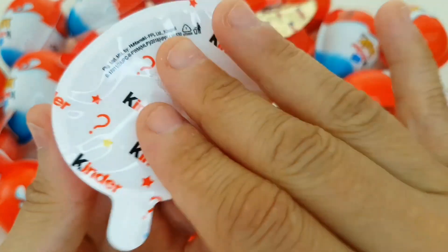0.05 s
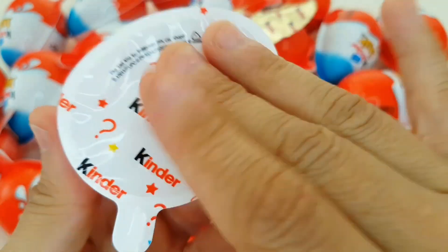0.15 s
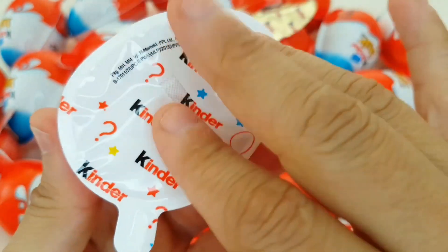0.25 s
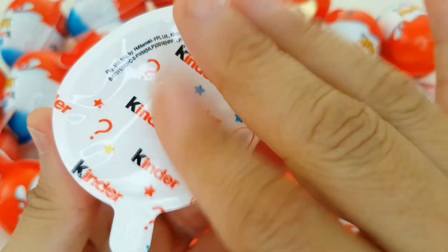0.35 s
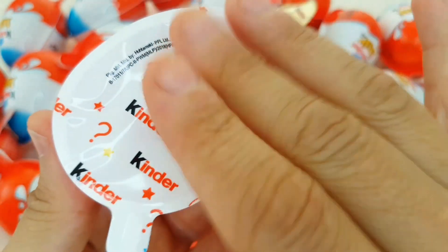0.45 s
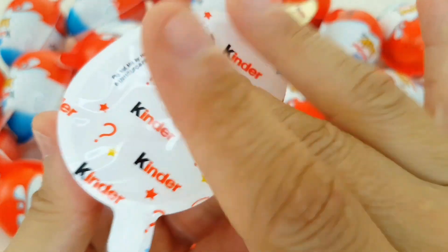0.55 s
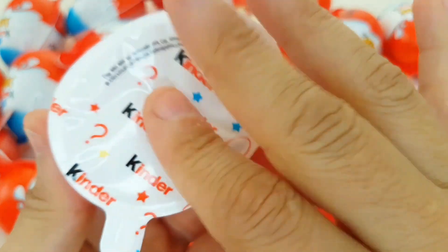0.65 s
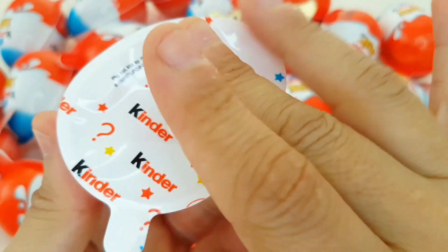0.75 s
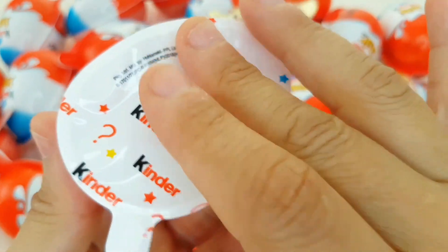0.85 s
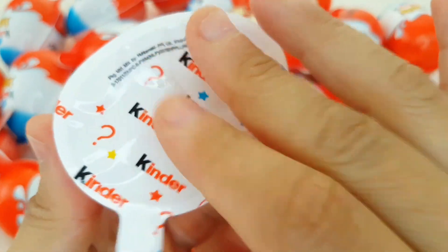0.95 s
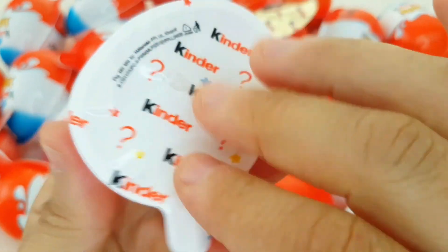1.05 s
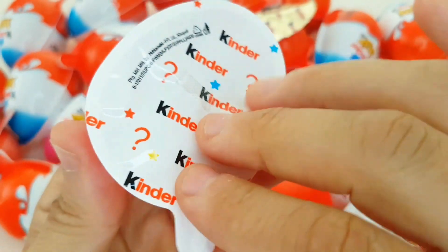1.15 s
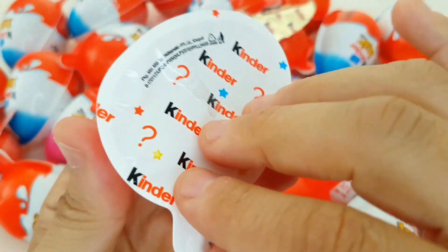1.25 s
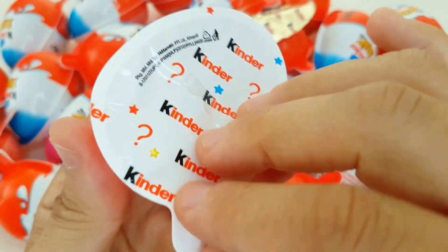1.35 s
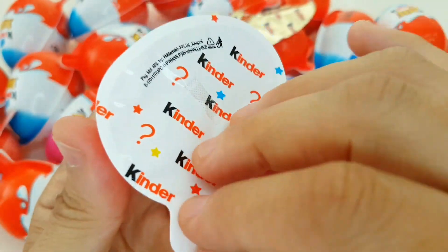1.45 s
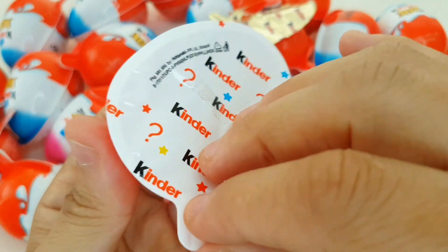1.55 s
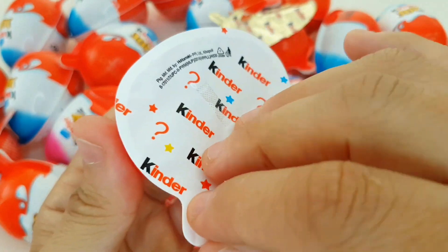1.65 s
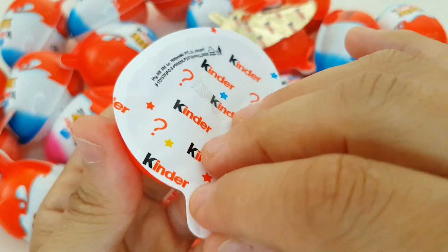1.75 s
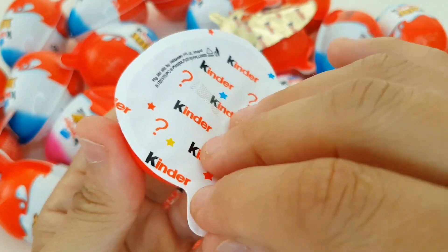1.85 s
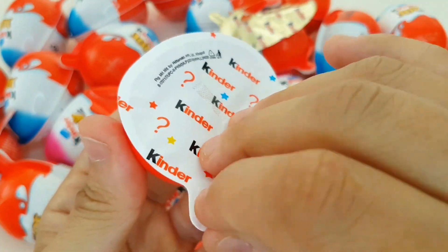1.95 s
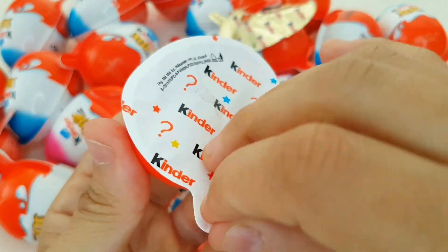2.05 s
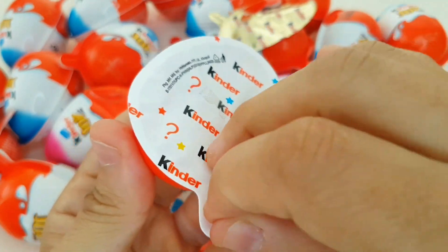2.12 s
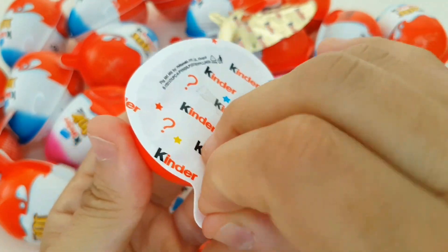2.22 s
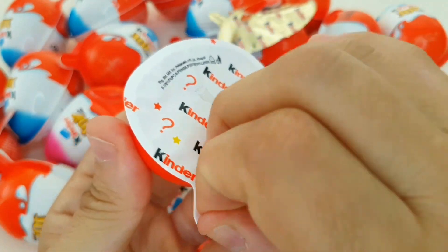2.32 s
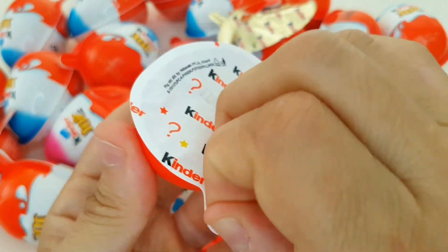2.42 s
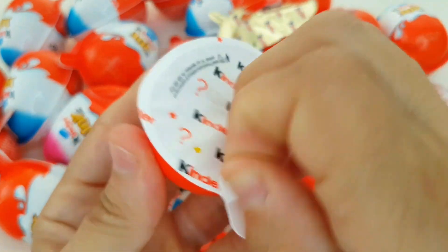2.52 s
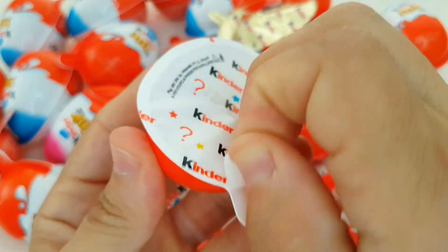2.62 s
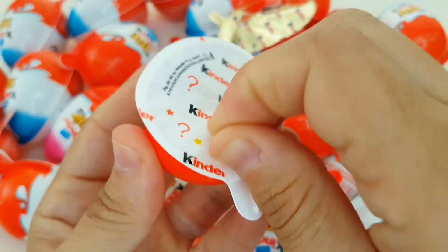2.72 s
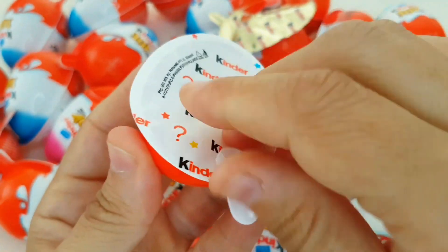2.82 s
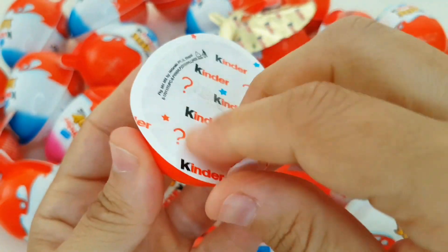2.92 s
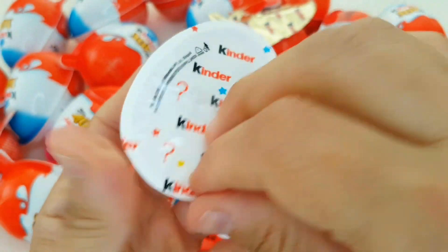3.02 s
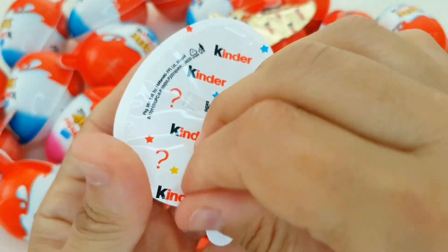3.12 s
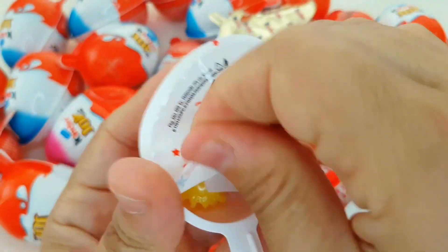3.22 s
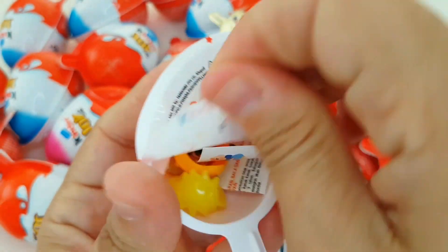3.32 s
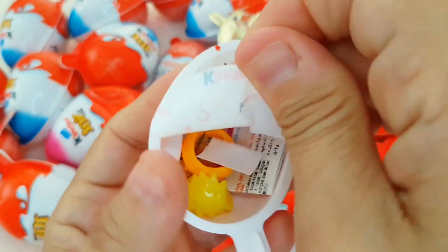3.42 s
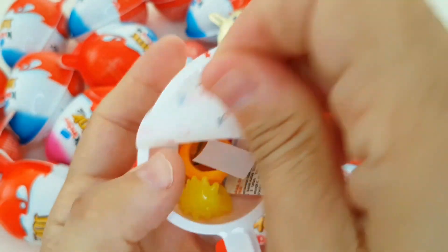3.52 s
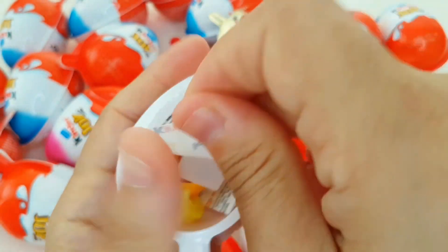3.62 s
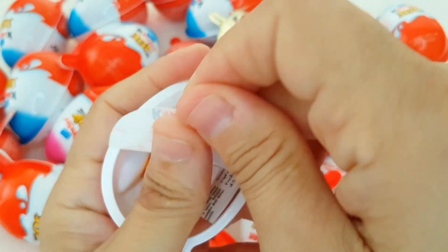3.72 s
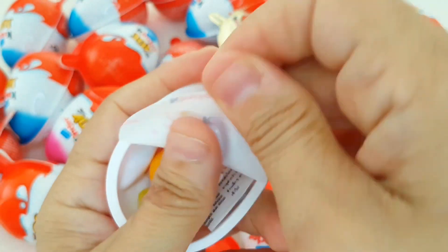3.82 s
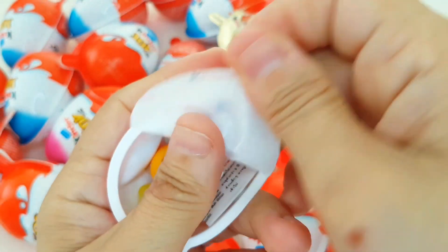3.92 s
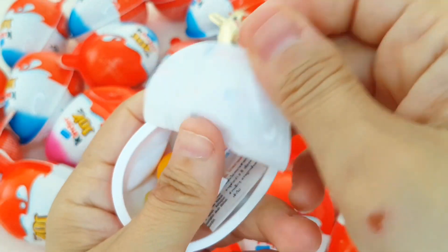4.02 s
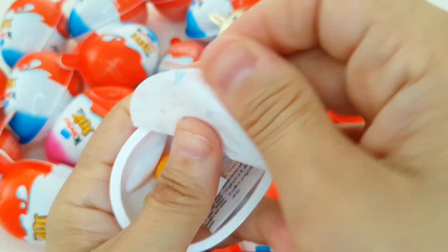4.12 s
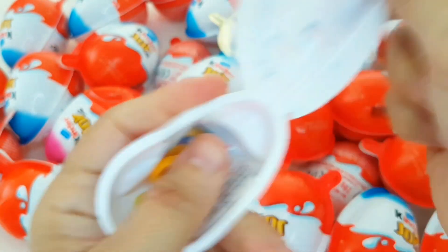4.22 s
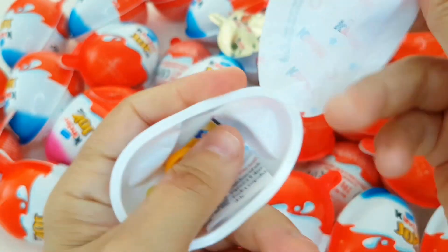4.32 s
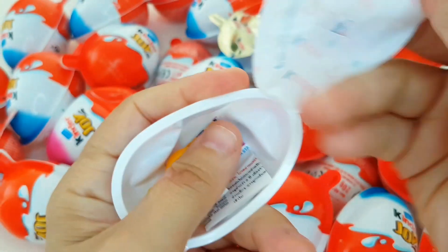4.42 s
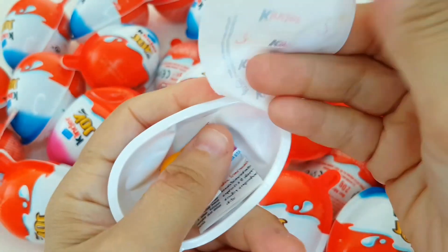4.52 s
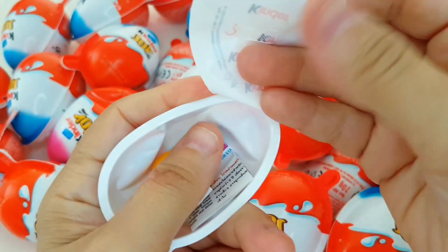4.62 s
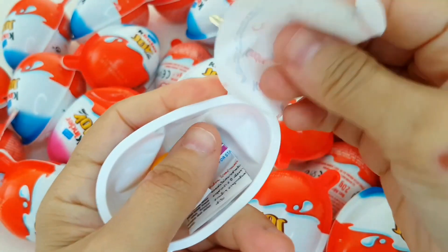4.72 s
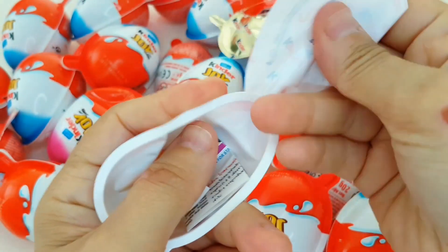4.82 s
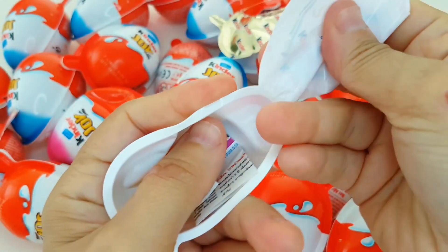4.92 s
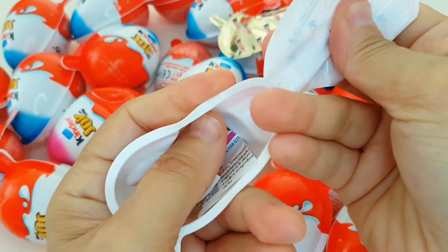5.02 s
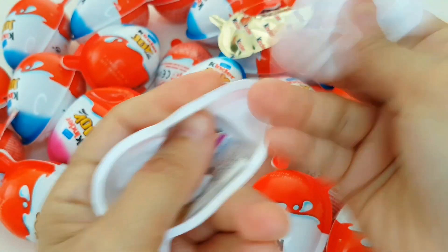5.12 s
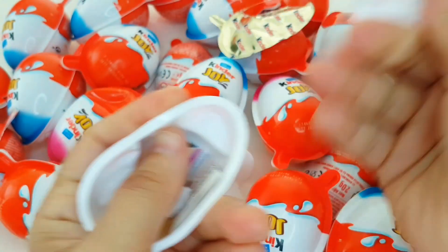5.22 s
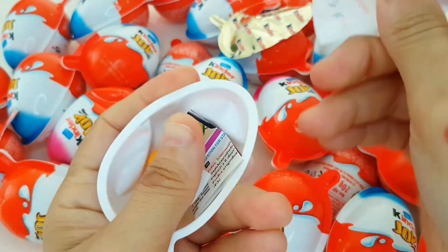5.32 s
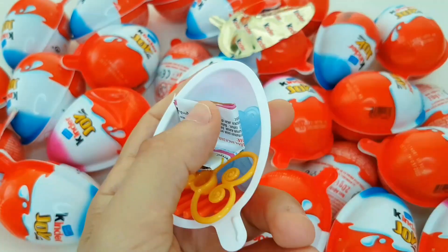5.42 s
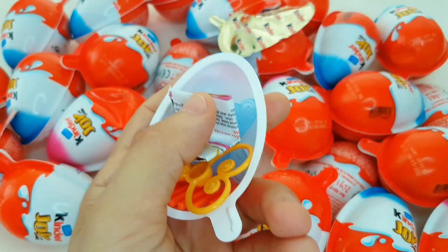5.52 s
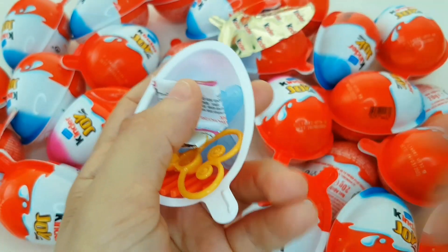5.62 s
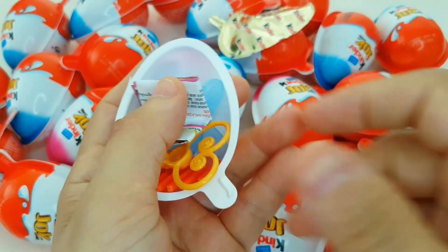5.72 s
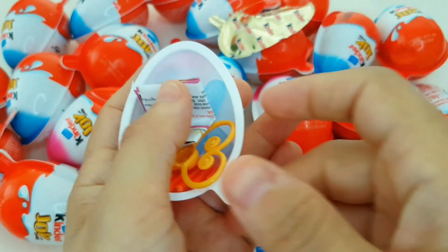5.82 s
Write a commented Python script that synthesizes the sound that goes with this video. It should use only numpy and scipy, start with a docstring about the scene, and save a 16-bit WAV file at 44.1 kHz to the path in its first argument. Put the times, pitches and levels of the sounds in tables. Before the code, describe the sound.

Thin foil buckles in crisp clicks of a few milliseconds under pressing fingers, the plastic cup thudding softly in the hand. After a pause of faint air, low grip rumble and one or two snaps, the lid is peeled back in uneven crackly clusters and tugged free with sharp pops. Everything cuts to quiet room air. Very close stereo pickup, slightly left then drifting to centre, in a small room.

```python
"""Crisp clicks and dense crackle, close up: fingers press on the foil lid of a small plastic cup, pick at its tab,
peel it back and tear it off. Each buckle of the foil is a click of a few milliseconds: two panel resonances, a crack,
a fine tick and a push of air. The seal gives way in random micro-clicks and sets off small buckles, and the cup thuds
softly in the hand. A small quiet room answers the foil, over faint air, hiss and a rumble of shifting grip."""
import sys
import numpy as np
from scipy import signal
from scipy.fft import rfft, irfft
from scipy.io import wavfile

SR = 44100
rng = np.random.default_rng(int(sys.argv[2]) if len(sys.argv) > 2 else 0)


def unload_audio(sound):
    """Save the sound as a 16-bit wav file, at the path given as the first command line argument."""
    columns = np.transpose(np.atleast_2d(sound))
    # keep every value between -1 and 1, then stretch to whole-number steps
    steps = np.round(np.clip(columns, -1, 1) * 32767)
    wavfile.write(sys.argv[1], SR, steps.astype(np.int16))


N = 258426  # length in samples

# The distinct buckles of the foil. Each row: start in seconds, relative level in dB, low resonance in Hz,
# high over low resonance in dB, sharpness (the crack over the click's level) in dB.
FOIL_BUCKLES = [(.0338, -37, 1060, -11.5, -8), (.052, -24, 820, 3.5, -10.5), (.189, -34.5, 850, 0, -8),
                (.1946, -37.5, 1070, -15, -13), (.2358, -25.5, 1340, 3, -27), (.2742, -21, 1010, -0.5, -18),
                (.307, -36.5, 1050, -6.5, -20), (.3392, -37, 895, -2.5, -14.5),
                (.3639, -33.5, 1180, -12, -16), (.4166, -17, 956, -2, -14.5),
                (.5441, -30.5, 1120, -2.5, -14), (.5511, -25.5, 950, 6, -20), (.6098, -33, 1310, 19, -19),
                (.6596, -15.5, 1093, -4.5, -4), (.6649, -25.5, 1170, 17, -7.5), (.7021, -39, 990, 13, -12),
                (.7238, -29.5, 1070, 7, -13), (.7517, -18.5, 837, -6.5, -15.5),
                (.9405, -39.5, 1010, 9, -17), (.9528, -38, 1160, 10, -13), (1.1544, -48, 1090, 4, -14),
                (1.2435, -53, 1140, 8, -5), (1.532, -60, 830, -26.5, -31), (1.8246, -20, 996, 1, -3),
                (2.1383, -38, 710, -2.5, -1), (2.2195, -60.5, 910, -30, -25), (2.4056, -48, 1050, -3, -37),
                (2.5181, -29, 850, 0.5, -10.5), (2.5444, -18, 810, 0, -8.5), (2.579, -25, 1120, 1, -6.5),
                (2.5872, -36, 1280, 26, -15), (2.5935, -21.5, 1210, 3.5, -2.5),
                (2.7752, -32.5, 1047, -3, -32), (2.9373, -27.5, 1400, 9, -32.5),
                (2.9483, -26.5, 1060, 4.5, -5.5), (3.0532, -38, 830, -6, -27),
                (3.0629, -36.5, 980, -9, -18.5), (3.1148, -33, 880, 8.5, -34), (3.2172, -30, 1200, 3.5, -7),
                (3.2306, -20.5, 1260, 8, -5.5), (3.236, -20, 1430, -17, 6.5),
                (3.2521, -15.5, 1210, 17.5, 0.5), (3.3531, -39, 1090, 22.5, 1),
                (3.3666, -22, 1280, 7.5, -6), (3.3876, -36, 1210, 14, 9), (3.4231, -18.5, 1430, 6.5, -6.5),
                (3.441, -29, 890, -3.5, 2.5), (3.5358, -35, 840, -2.5, -13.5),
                (3.6238, -31, 1480, -10.5, -7.5), (3.7943, -38, 700, 4.5, -19),
                (3.8157, -21.5, 1180, 12.5, -10.5), (3.8581, -23, 1150, 5.5, -3),
                (3.922, -37, 965, 3.5, -15), (3.9757, -14, 880, 9.5, -7.5), (4.0104, -20, 855, -3.5, -8),
                (4.0502, -24.5, 835, 6, -8), (4.0892, -35, 855, -3, 2), (4.1654, -36.5, 894, 5.5, -15.5),
                (4.1829, -28, 1450, -3, -1.5), (4.1918, -33.5, 1180, 17.5, 1.5),
                (4.2105, -30.5, 1276, 20.5, 6.5), (4.2427, -15.5, 590, 0, -25),
                (4.2525, -16, 970, 1.5, 0.5), (4.2661, -15, 874, -8, -14), (4.3004, -35, 836, -4.5, -9.5),
                (4.3198, -33.5, 665, 1, -9.5), (4.3396, -43, 910, -5, 6.5), (4.4004, -24, 875, 3, -3.5),
                (4.4775, -38, 640, -0.5, -1.5), (4.492, -16.5, 866, 5, -3.5), (4.518, -23, 910, 4.5, 0.5),
                (4.5322, -26, 920, -0.5, -17), (4.7639, -26, 1130, 5, 5.5), (4.7671, -26.5, 890, -0.5, 9.5),
                (4.8027, -21, 865, -1.5, -31), (4.8091, -26, 1005, -4.5, 3.5), (4.8146, -15, 724, 4.5, -9),
                (4.8879, -22.5, 950, 12, -1), (4.8951, -27, 820, -7.5, 10.5),
                (4.9362, -36, 1006, 1.5, -4.5), (5.1437, -16.5, 696, 5.5, 0), (5.202, -36, 820, -4, -1),
                (5.26, -23, 836, 5, 0.5), (5.3086, -34, 1255, 0.5, 0), (5.3683, -28, 950, 5, -6.5)]
# Strokes of peeling and rubbing. Each row: start in seconds, length in seconds, relative level in dB,
# relative treble level in dB.
PEEL_STROKES = [(0.055, 0.029, -46, -11), (0.078, 0.049, -58, -8), (0.293, 0.083, -58.5, 3),
                (0.661, 0.046, -38.5, -10), (1.05, 0.43, -71, -10), (3.003, .22, -56, -18),
                (3.219, 0.072, -38.5, 7), (3.34, .11, -34, -12), (3.59, 0.089, -49, -10.5),
                (3.667, 0.16, -59, -1), (3.947, 0.13, -48, 2.5), (4.207, .068, -22.5, -5.5),
                (4.283, 0.18, -53, -11), (4.507, 0.04, -29, -7), (4.674, 0.041, -47.5, -5.5),
                (4.704, 0.047, -40, 0), (4.761, .11, -41, -0.5), (5.152, 0.068, -40.5, -6.5),
                (5.28, 0.12, -55, 5)]
# Soft knocks of the cup and its lid against the hand. Each row: start in seconds, pitch in Hz,
# level in dB, 60 dB decay time in seconds.
CUP_THUDS = [(.053, 394, -24.5, 0.026), (0.273, 383, -27.5, 0.019), (.416, 390, -30, 0.044),
             (0.657, 404, -16.5, 0.015), (0.658, 118, -49.5, 0.17), (0.754, 107, -41, 0.18),
             (2.544, 313, -31.5, 0.029), (3.238, 323, -39, 0.53), (3.622, 108, -34.5, 0.071),
             (4.214, 125.5, -32, 0.24), (4.25, 367, -31.5, 0.16), (4.517, 250, -24.5, .04),
             (4.81, 160, -49, 0.11), (5.309, 130.2, -37.5, 0.091), (5.371, 124.5, -34, .086)]
# Where the foil is. Each row: time in seconds, lead of the left side in ms, left minus right level in dB.
FOIL_PLACE = [(0, 0.21, 7), (2.5, .2, 5), (3.3, 0.18, 3.5), (4, .17, 4.5), (4.2, 0.15, 6), (4.35, 0.075, 0),
              (4.85, .04, 2.5), (5.15, 0.017, -3), (5.4, -0.067, -0.5)]
# Colour of the room's answer. Each row: frequency in Hz, relative level in dB.
ROOM_COLOUR = [(80, -5.5), (200, 2), (330, 7), (500, -2.5), (750, 9.5), (1150, -2), (1600, -3), (2400, -5),
               (3200, 1), (4300, -2.5), (8000, -5.5), (15000, -2.5)]
# Resonances of the cup and the space around it, some short, some long. Each row: frequency in Hz,
# level against the room's tail in dB, 60 dB decay time in seconds.
ROOM_RINGS = [(123, -25, 0.18), (330.7, -26, 0.51), (509.3, -13.5, 0.078), (955, -12.5, 0.3),
              (2260, -26, 0.32), (2865, -22, 0.59)]
# Colour of the air and hiss. Each row: frequency in Hz, relative level in dB per Hz.
AIR_COLOUR = [(25, -5.5), (60, -7), (110, -4), (180, -7.5), (260, -6.5), (335, -4), (450, -11.5),
              (700, -16), (2200, -21), (4000, -27), (8500, -33.5), (15000, -27)]
# The hands shift their grip. Each entry: centre of a swell of rumble in seconds.
GRIP_SHIFTS = [1.15, 1.61, 2.12]

AIR_DB = -60.5
GRIP_DB, GRIP_S = -62, 0.14  # rumble at the top of a swell, half length of a swell
ROOM_DB, ROOM_T60_S, ROOM_TREBLE_T60_S = -13, 0.32, 0.3
ROOM_SPLIT_HZ = 3000  # the treble tail starts here

LOOSE_S = 4.2  # from here on the lid hangs loose
TAUT_PITCH = 1.56  # pitch ratio of the rubbed lid's low resonance while it is held taut
PEEL_NEAR_DB, PEEL_FINGERS_DB = -2.5, 0.5  # direct sound of a stroke, and its reflection off the fingers
FIZZ_DB = -1  # added to each stroke's treble level

# Small buckles set off by a stroke: level = SMALL_DB + SMALL_GROWTH * level of the stroke.
BONDS_PER_BUCKLE, SMALL_DB, SMALL_GROWTH = 45, -16, 0.5
SMALL_HZ, SMALL_SHARP_DB, SMALL_SCATTER_DB, SMALL_SCATTER_OCTAVES = 990, -13.5, 3, 0.21

CLICK_S, CLICK_NEAR_DB = .005, -2  # span that sets the energy of a click, gain of its direct sound
HIGH_HZ, HIGH_OCTAVES_PER_DB = 2210, .016  # a sharper crease is stiffer and rings higher
TICK_DB, TICK_BEAM_DB, TICK_HZ = -5, 6, 7360  # tick against the crack, its lean to the left, where it takes over
# Air shoved by a flipping patch, against its low resonance: much while the whole lid is pressed,
# little while its edge is picked and peeled, much again once it hangs loose.
PRESS_PUSH_DB, PICK_PUSH_DB, LOOSE_PUSH_DB = -12, -16, -8
PICK_S = .72  # the picking starts
FORERUN_DB, FORERUN_S = -15, 0.0013  # each faint copy ahead of a click: how much weaker per step, how much earlier per step on average
EARLY_DB, EARLY_T60_S = -8, 0.021  # a click's reflection off the fingers

STOP_S, STOP_FADE_S = 5.393, 0.0085  # end of all but the quiet
CEILING, TOP_HZ = 1.1, 15700  # rounding of the peaks, upper limit of the sound


def undb(db):
    """Decibels to gain."""
    return 10 ** (np.asarray(db) / 20)


def fade(t, t60):
    """Free decay, 60 dB down after t60 seconds."""
    return np.exp(-np.log(1000) * t / t60)


def band(x, lo_hz, hi_hz, order=2):
    """Causal band-pass."""
    edges = [lo_hz, min(hi_hz, SR / 2 - 1)]
    return signal.sosfilt(signal.butter(order, edges, "bandpass", fs=SR, output="sos"), x)


def unit(x):
    """Scale to an energy of one per channel."""
    return x / np.sqrt(np.sum(x ** 2, axis=-1, keepdims=True))


def colour(x, points):
    """Shape a sound by (Hz, dB) points, joined along log frequency."""
    hz, db = np.transpose(points)
    f = np.maximum(np.fft.rfftfreq(x.shape[-1], 1 / SR), 1)
    gain = undb(np.interp(np.log(f), np.log(hz), db))
    return irfft(rfft(x) * gain, x.shape[-1])


def diffuse(n, alike_hz=800):
    """Noise from all around: long waves reach both sides alike, short ones do not."""
    mid, side = rng.standard_normal((2, n))
    apart = colour(side, [(alike_hz / 10, -24), (alike_hz, -4), (2 * alike_hz, 0)])
    return np.array([mid + apart, mid - apart])


def lean(db):
    """Left and right gains for a level difference."""
    return undb(db * np.array([[1], [-1]]) / 2)


def place(s):
    """Lead of the left side in seconds, and the two gains, for the foil at time s."""
    times, lead_ms, pan_db = np.transpose(FOIL_PLACE)
    lead = np.interp(s, times, lead_ms) / 1000
    return lead, lean(np.interp(s, times, pan_db))


def add(out, s, x):
    """Mix a sound in at time s on the left; the right follows by the lead, or precedes if that is negative."""
    lead, _ = place(s)
    sides = np.broadcast_to(x, (2, x.shape[-1]))
    for side, one, start in zip(out, sides, (s, s + lead)):
        i = int(start * SR)
        side[i:i + len(one)] += one[:N - i]


def quiet():
    """Faint room air and hiss as coloured noise, with low rumble that swells as the grip shifts."""
    air = unit(colour(diffuse(N, alike_hz=298), AIR_COLOUR)) * undb(AIR_DB)
    t = np.arange(N) / SR
    swells = sum(np.exp(-((t - s) / GRIP_S) ** 2) for s in GRIP_SHIFTS)
    rumble = unit(band(rng.standard_normal(N), 20, 41)) * undb(GRIP_DB) * swells
    return (air + rumble) * np.sqrt(N)  # from unit energy to unit RMS


def room():
    """The walls' answer to a click: they ring on, the treble a little shorter; a few resonances stand out."""
    t = np.arange(SR // 2) / SR
    bass = band(diffuse(len(t)), 68, ROOM_SPLIT_HZ) * fade(t, ROOM_T60_S)
    treble = band(diffuse(len(t)), ROOM_SPLIT_HZ, 20000) * fade(t, ROOM_TREBLE_T60_S)
    build_up = 1 - fade(t, 0.0077)
    tail = unit(colour(bass + treble, ROOM_COLOUR) * build_up)
    for hz, db, t60 in ROOM_RINGS:
        tail = tail + undb(db) * unit(np.sin(2 * np.pi * hz * t) * fade(t, t60))
    dying = np.clip((t[-1] - t) / .1, 0, 1)
    return undb(ROOM_DB) * tail * dying


def thuds():
    """Each knock of cup or lid is one decaying note, mostly short; one rings on."""
    out, t = np.zeros((2, N)), np.arange(SR // 2) / SR
    for s, hz, db, t60 in CUP_THUDS:
        add(out, s, undb(db) * np.sin(2 * np.pi * hz * t) * fade(t, t60))
    return out


def bond_rate(db):
    """Bonds broken per second: a harder pull breaks more."""
    return np.interp(db, [-66, -57, -22], [60, 500, 1300])


def crackle(n, per_s, spread_db):
    """Tiny bonds that break at random, most of them weak."""
    fired = rng.random(n) < per_s / SR
    sizes = undb(spread_db * np.minimum(rng.exponential(size=n), np.pi))
    return fired * sizes * rng.choice([-1, 1], n)


def peeling():
    """Glue lets go and foil rubs: micro-clicks through the lid's broad resonances, denser in a harder pull."""
    out, t = np.zeros((2, N)), np.arange(int(SR * .01)) / SR
    for s, length, db, treble_db in PEEL_STROKES:
        n = int(length * SR)
        # one second is drawn and cut to the stroke
        breaks = crackle(SR, bond_rate(db), spread_db=7.0)[:n] * signal.windows.tukey(n, .3)
        breaks = np.pad(breaks, (0, len(t)))
        stiff = TAUT_PITCH if s < LOOSE_S else 1
        body = unit(band(breaks, 470 * stiff, 950 * stiff) + undb(0.5) * band(breaks, 1200, 2300))
        # every break sheds its own short spray of hiss, different on each side
        spray = signal.fftconvolve(breaks ** 2, fade(t, .003))[:len(breaks)]
        hiss = np.sqrt(np.abs(spray)) * rng.standard_normal((2, len(breaks)))
        fizz = unit(band(hiss, 4000, 5330) + undb(-10.0) * band(hiss, 7600, 13000))
        _, sides = place(s)
        stroke = (body + undb(treble_db + FIZZ_DB) * fizz) * np.sqrt(n) * undb(db) * sides
        fingers = unit(diffuse(len(t)) * fade(t, 0.012))
        reflected = signal.fftconvolve(stroke, fingers, axes=1)[:, :len(breaks)]
        add(out, s, undb(PEEL_NEAR_DB) * stroke + undb(PEEL_FINGERS_DB) * reflected)
    return out


def small_buckles():
    """Every stroke flexes the foil and sets off small buckles, more and stronger in a harder pull."""
    rows = []
    for start, length, db, _ in PEEL_STROKES:
        count = int(round(length * bond_rate(db) / BONDS_PER_BUCKLE))
        for k in range(count):
            strength, size, tilt = rng.standard_normal(3)
            s = start + length * (k + rng.random()) / count
            level_db = SMALL_DB + SMALL_GROWTH * db + SMALL_SCATTER_DB * strength
            low_hz = SMALL_HZ * 2 ** (SMALL_SCATTER_OCTAVES * size)
            rows.append((s, level_db, low_hz, SMALL_SCATTER_DB * tilt, SMALL_SHARP_DB))
    return rows


def panel(t, hz, t60, split=0.3, side_db=-7, skirt=2.23):
    """A patch of foil flips: one main mode with a weaker neighbour on each side."""
    detune = 1 + split * np.array([0, -1, 1]) * (.5 + rng.random(3))
    size = np.array([1, *(undb(side_db) * rng.standard_normal(2))])
    modes = np.sin(2 * np.pi * hz * detune[:, None] * t) * fade(t, t60)
    return unit(band(size @ modes, hz / skirt, hz * skirt))


def snap(t, lo_hz, hi_hz, t60, edge=2.08):
    """A crease gives way: a sharp edge, then a scatter that differs from side to side."""
    x = rng.standard_normal((2, len(t))) * fade(t, t60)
    x[:, 0] += edge
    return unit(band(x, lo_hz, hi_hz, order=3))


def air_push(t, s):
    """The air that a flipping patch shoves: a short low-mid pulse, its strength set by how the lid is held."""
    push_db = PRESS_PUSH_DB if s < PICK_S else PICK_PUSH_DB if s < LOOSE_S else LOOSE_PUSH_DB
    return undb(push_db) * unit(band(fade(t, 0.00033), lo_hz=106.9, hi_hz=616, order=3))


def buckles(rows):
    """Single clicks of the lid, as they reach the microphone and as they spread into the room."""
    near, spread = np.zeros((2, N)), np.zeros((2, N))
    t = np.arange(int(SR * .03)) / SR
    for s, db, low_hz, tilt_db, sharp_db in rows:
        low, high = undb(-tilt_db / 2), undb(tilt_db / 2)
        high_hz = HIGH_HZ * 2 ** (HIGH_OCTAVES_PER_DB * sharp_db)
        rings = low * panel(t, low_hz, t60=0.015) + high * panel(t, high_hz, t60=0.0032)
        crack = undb(sharp_db) * snap(t, lo_hz=3270, hi_hz=TICK_HZ, t60=0.0049)
        tick = snap(t, lo_hz=TICK_HZ, hi_hz=16000, t60=0.0045)
        tick = undb(sharp_db + TICK_DB) * lean(TICK_BEAM_DB) * tick
        push = low * air_push(t, s)
        size = rng.choice([-1, 1]) * np.sqrt(CLICK_S * SR) * undb(db)
        _, sides = place(s)
        click = size * (rings + crack + tick + push) * sides * undb(CLICK_NEAR_DB)
        # the moving fingers reflect each click differently
        fingers = unit(diffuse(len(t)) * fade(t, EARLY_T60_S) * (t > .001))
        add(near, s, click)
        add(near, s, undb(EARLY_DB) * signal.fftconvolve(click, fingers, axes=1))
        # two faint early copies lead into each click, the later one stronger; step counts back from the click
        for step in (1, 2):
            early = FORERUN_S * (step + rng.random() - .5)
            add(near, s - early, undb(step * FORERUN_DB) * click)
        # summed over all directions, the resonances blur into broad bands
        broad_low = low * undb(-8.0) * snap(t, lo_hz=463, hi_hz=1360, t60=0.0028)
        broad_high = high * undb(-1.0) * snap(t, lo_hz=1340, hi_hz=2620, t60=0.0029)
        add(spread, s, size * (broad_low + broad_high + crack + tick + push))
    return near, spread


def scene():
    """Foil and cup, the foil answered by the room; near the end all of it breaks off at once, the room's
    ringing too, and only the quiet is left."""
    air, walls, peel = quiet(), room(), peeling()
    clicks, spread = buckles(FOIL_BUCKLES + small_buckles())
    answer = signal.fftconvolve(spread + peel, walls, axes=1)[:, :N]
    lasting = np.clip((STOP_S - np.arange(N) / SR) / STOP_FADE_S, 0, 1)
    return (clicks + peel + thuds() + answer) * lasting + air


def record(dry):
    """The loudest peaks are rounded off, and the top is cut."""
    rounded = CEILING * np.tanh(dry / CEILING)
    return signal.sosfilt(signal.ellip(8, .2, 70, TOP_HZ, fs=SR, output="sos"), rounded)


dry = scene()
out = record(dry)
unload_audio(out)
```